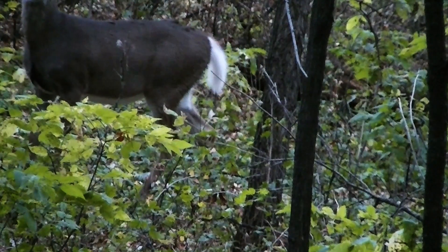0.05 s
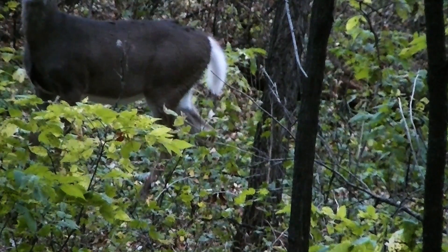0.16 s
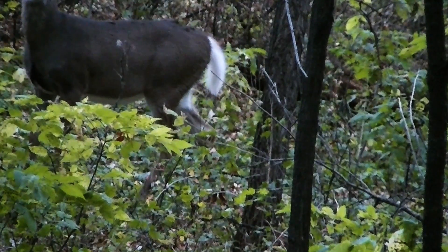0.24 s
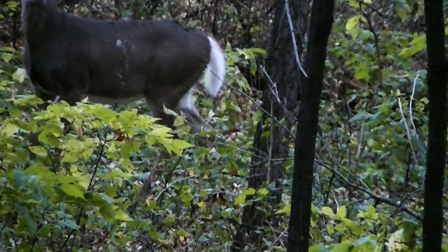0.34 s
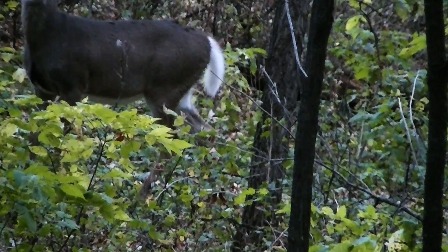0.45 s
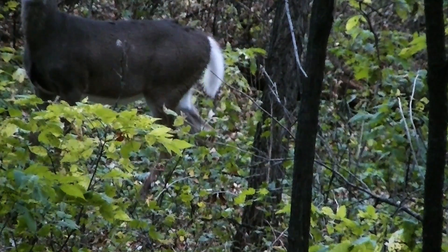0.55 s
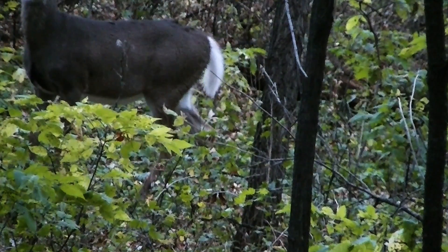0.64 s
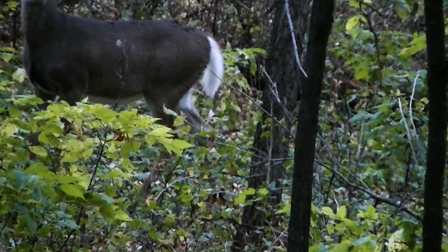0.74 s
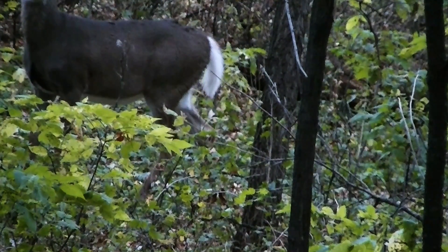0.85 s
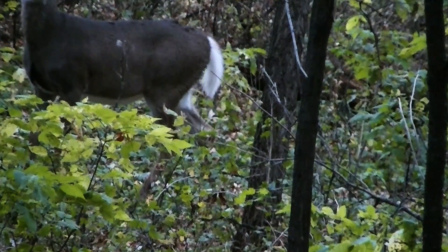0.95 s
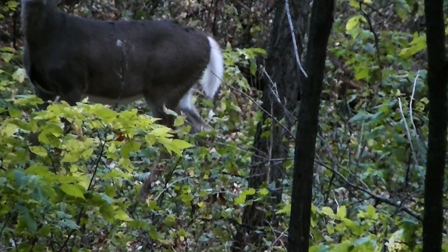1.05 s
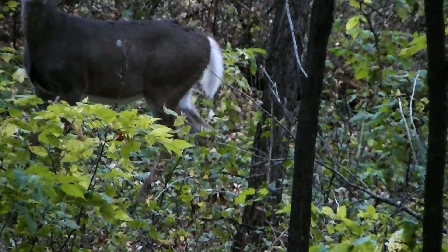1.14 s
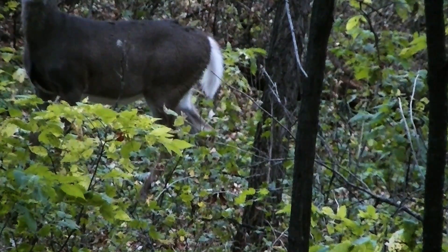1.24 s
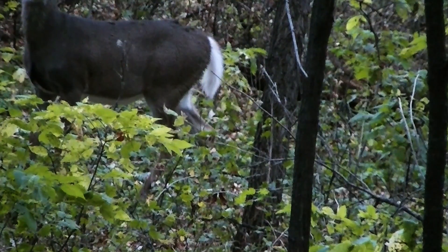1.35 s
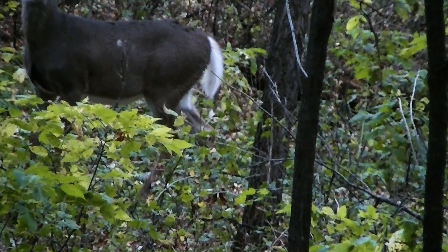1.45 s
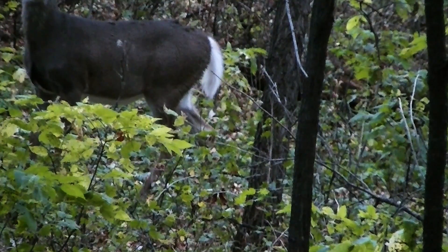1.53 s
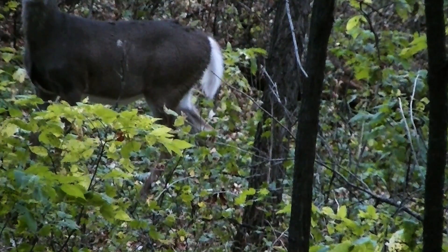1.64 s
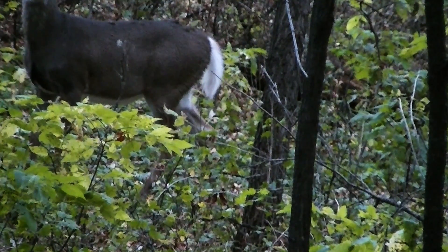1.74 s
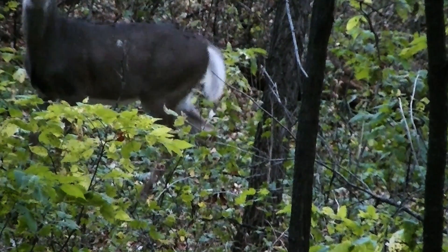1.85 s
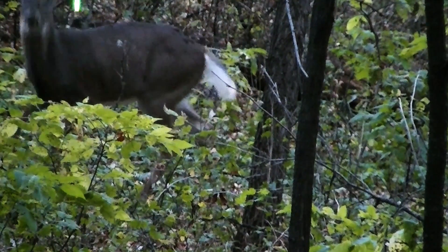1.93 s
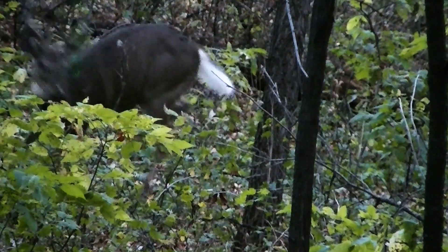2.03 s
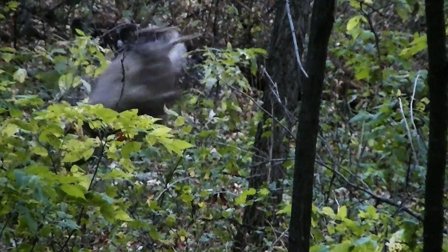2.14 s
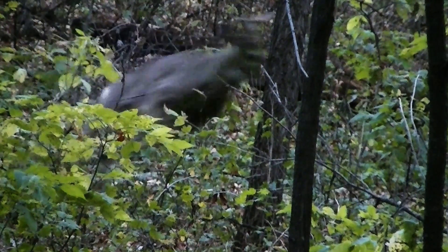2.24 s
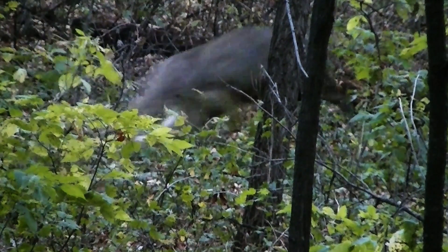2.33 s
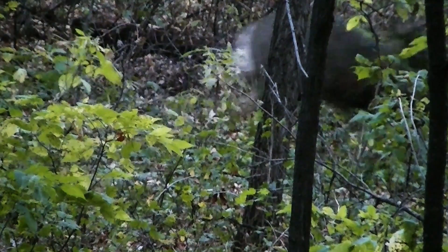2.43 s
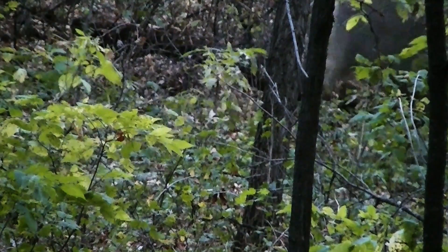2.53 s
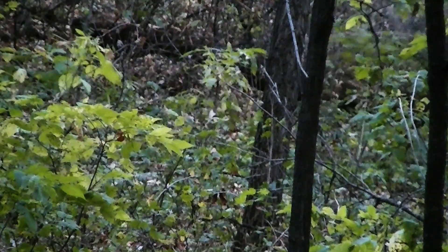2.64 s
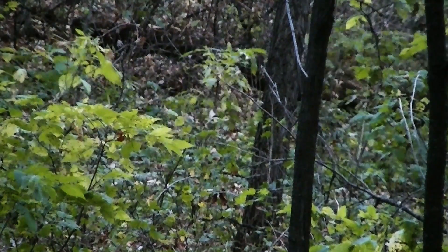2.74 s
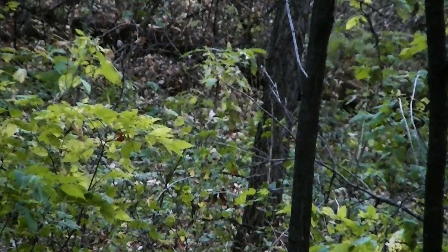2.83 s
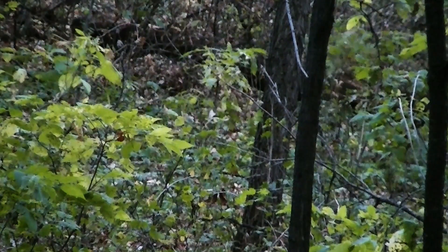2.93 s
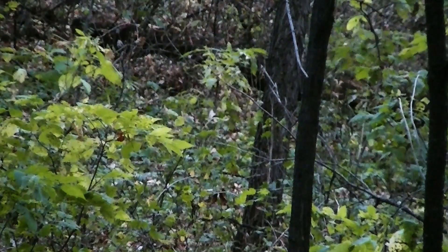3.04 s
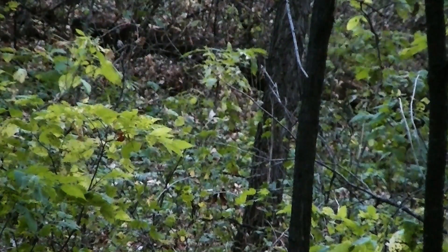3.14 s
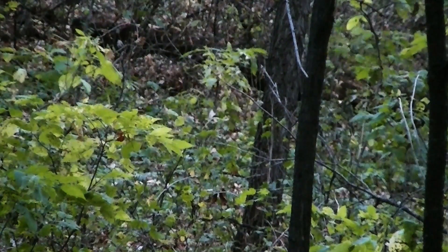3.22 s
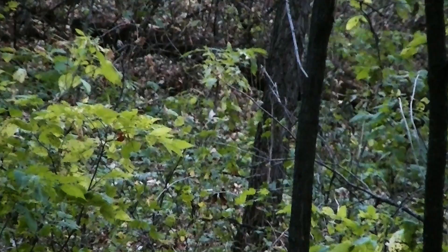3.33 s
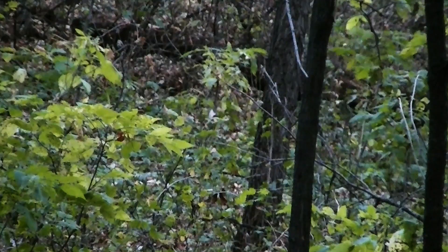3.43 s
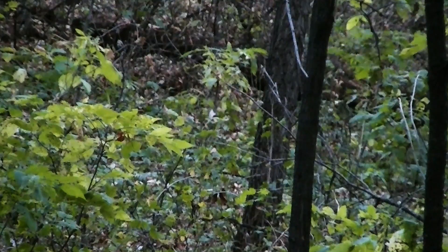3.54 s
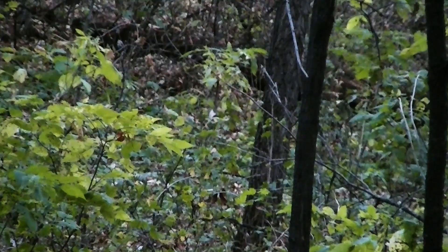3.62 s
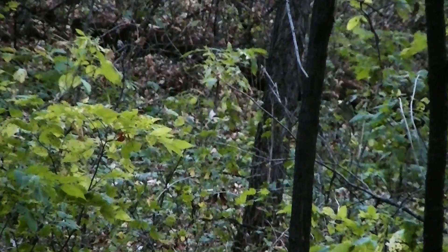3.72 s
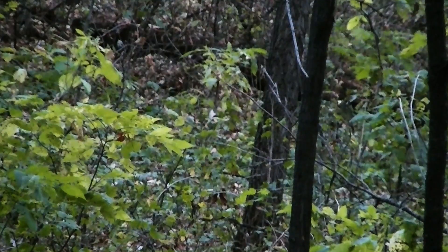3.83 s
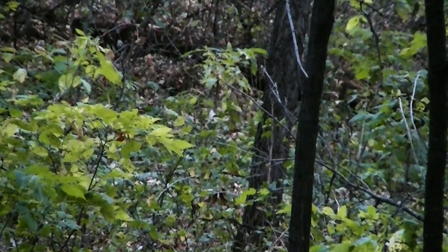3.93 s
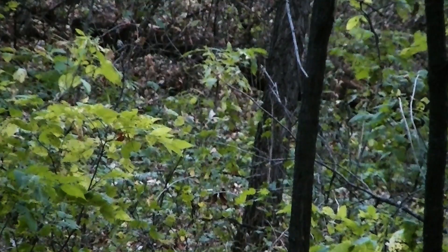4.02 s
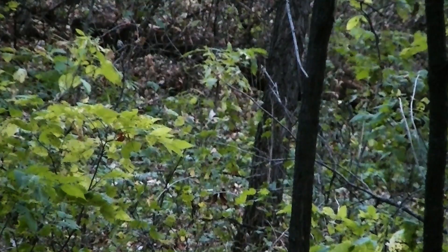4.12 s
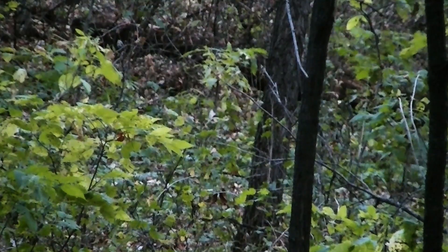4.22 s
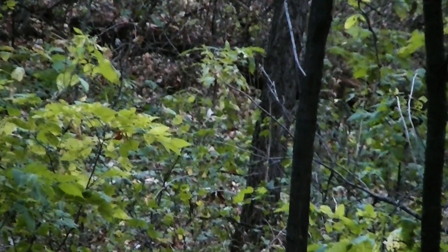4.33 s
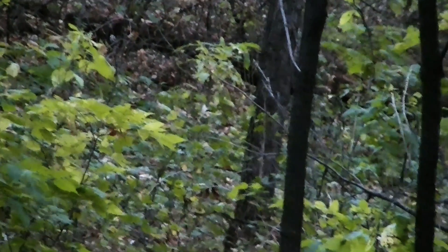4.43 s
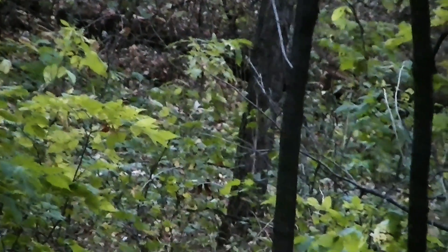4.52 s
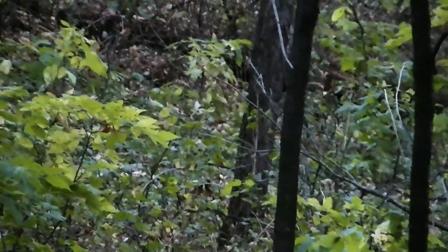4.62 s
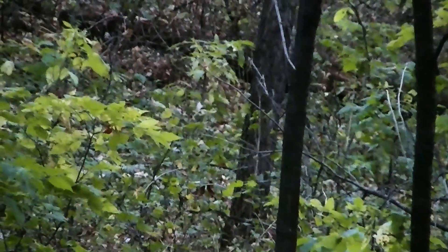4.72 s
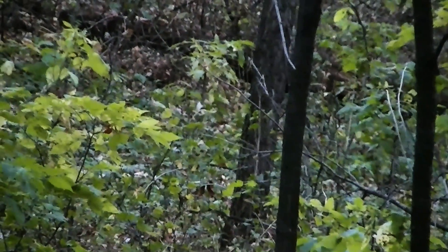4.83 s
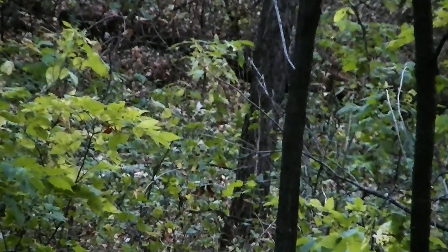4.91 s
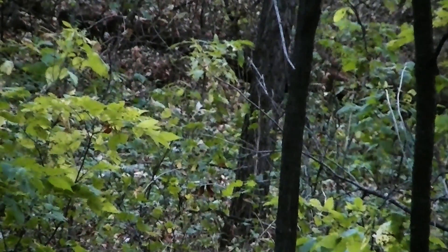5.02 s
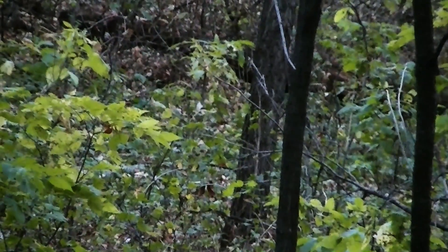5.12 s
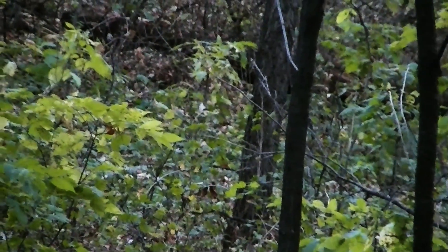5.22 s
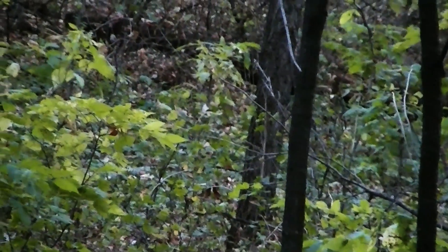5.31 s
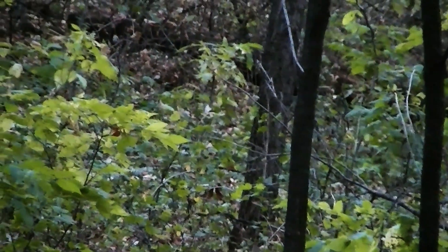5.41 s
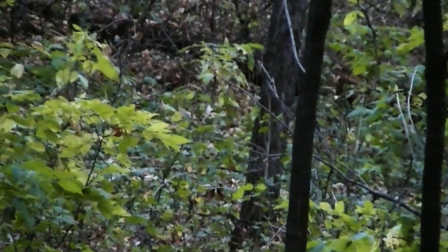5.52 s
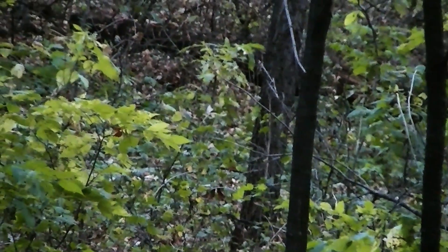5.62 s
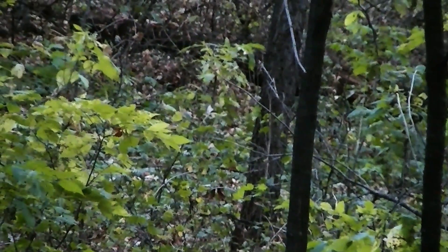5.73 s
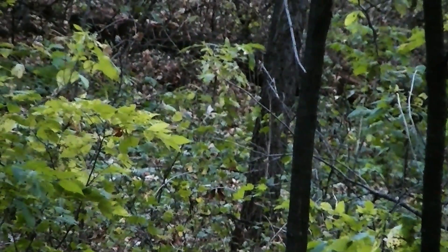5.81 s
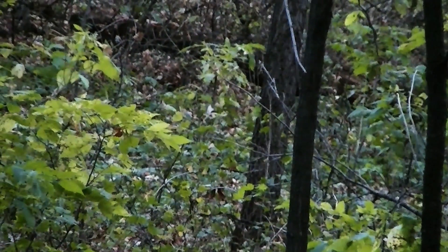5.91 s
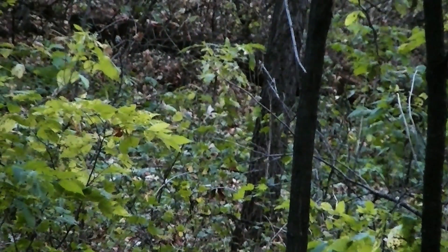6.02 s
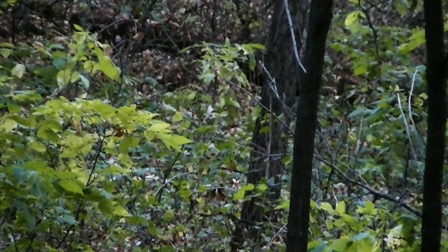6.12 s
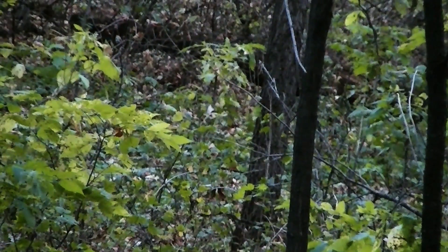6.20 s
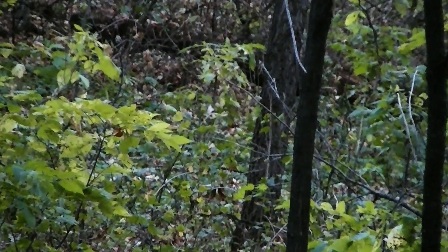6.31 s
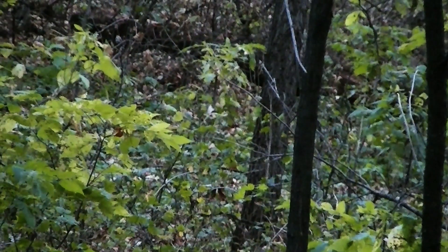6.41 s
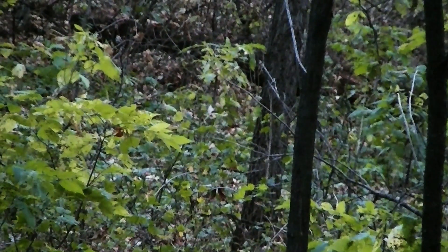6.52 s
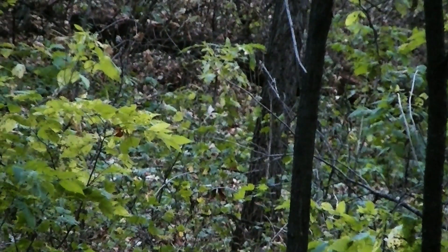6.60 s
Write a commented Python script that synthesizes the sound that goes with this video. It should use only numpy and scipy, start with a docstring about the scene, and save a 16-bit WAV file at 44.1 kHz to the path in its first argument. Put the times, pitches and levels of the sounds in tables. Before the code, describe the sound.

Near silence with recorder hiss and a tiny click, then a bow close to the microphone releases with a loud, distorted, rattling twang. Half a second later an arrow smacks hard into a deer, which bolts through dry leaves and brush, snapping twigs. Two faint low moans fall in pitch, with thin peeps around the first, as the rustling thins out in the woods.

```python
"""First there is only the recorder's own hiss and a small click; then a bow close by is loosed in the woods, and
its string thumps and slaps it again and again, overloading the recorder. Brush starts to rustle, and the arrow
smacks into a deer, which bounds away through leaves and snapping twigs. Later a low moan falls in pitch, two
thin tones peep, and the moan comes once more. Hisses and cracks are shaped noise, rings and calls are sine
tones; the trees answer the bow, blows and twigs with a short wash of noise."""
import sys
import numpy as np
from scipy import signal
from scipy.fft import rfft, irfft, next_fast_len
from scipy.io import wavfile
from scipy.ndimage import uniform_filter1d, map_coordinates

SR = 44100
rng = np.random.default_rng(int(sys.argv[2]) if len(sys.argv) > 2 else 0)


def unload_wav(signal):
    """Save mono or channel-first audio to the path in sys.argv[1] as 16-bit WAV at rate SR, clipped to [-1, 1]."""
    wavfile.write(
        sys.argv[1],
        SR,
        np.round(np.clip(np.atleast_2d(signal).T, -1, 1) * 32767).astype(np.int16),
    )


N = 293660

# Noise colours hold relative levels; t60 is the time in which a sound fades by 60 dB.
# colour of the recorder's own hiss: (frequency [Hz], level per Hz [dB])
HISS_COLOUR = [(12, -54), (20, -17), (59, -26), (162, -6.5), (315, -1.5), (394, -2), (479, 1), (633, -0.5),
               (836, 0.5), (1420, -7.5), (6390, -11.5), (12100, -17), (15600, -22.5)]
# how alike left and right are in the hiss: (frequency [Hz], likeness [0 to 1])
HISS_ALIKE = [(60, 0.7), (180, 0.97), (550, 0.84), (1650, 0.38), (4970, 0.66), (15000, 1)]
# how long the trees answer: (frequency [Hz], t60 [s])
TREE_FADE = [(200, 1), (1000, 1), (4000, 0.7), (7400, 0.63), (15000, 0.77)]
# colour of the trees' answer: (frequency [Hz], level per Hz [dB])
WASH_COLOUR = [(150, -18), (400, 5), (3000, -5), (6300, 9), (7400, -13), (8600, 1.5), (15000, -2.5)]
# path of each moan, one list a call: (time [s], middle pitch [Hz], middle level [dB])
MOANS = [
    [(4.15, 440, -53), (4.24, 410, -47), (4.38, 370, -43), (4.5, 350, -52)],
    [(6.25, 420, -56), (6.33, 395, -50), (6.55, 370, -45.5), (6.66, 360, -59)],
]
# short thin tones: (time [s], length [s], starting pitch [Hz], level before throb and fade [dB])
CHEEPS = [(4.378, 0.022, 1690, -38), (4.72, 0.052, 1844, -24.5)]
# colour of dry leaves: (frequency [Hz], level per Hz [dB])
LEAF_COLOUR = [(880, -36), (1500, -9), (2430, -11), (3340, -1.5), (5350, 1), (7300, -8), (9490, -72),
               (16100, -120)]
# colour of the leaves' extra treble: (frequency [Hz], level per Hz [dB])
TREBLE_COLOUR = [(4350, -19.5), (7400, -7), (8200, 2.5), (10000, -1), (14400, -18), (15600, -22)]
# colour of thrashing stems: (frequency [Hz], level per Hz [dB])
STEM_COLOUR = [(88, -44), (150, -25), (209, -4), (237, -20), (287, -7.5), (1030, -3), (2500, -3.5),
               (3250, -2.5), (5500, -120)]
# how alike left and right are in the brush: (frequency [Hz], likeness [0 to 1])
BRUSH_ALIKE = [(60, 0.49), (180, 0.96), (550, 1), (1650, 1), (4970, 0.97), (15000, 0.97)]
# steady rustle under the strides: (time [s], leaves [dB], treble over leaves [dB], stems over leaves [dB],
# tilt, which lifts the leaves above 4.2 kHz and lowers them below by this much [dB])
RUSTLE = [(1.8, -29, -9, 3, 2), (1.88, -41, -6, -9, -5), (2.03, -39, -8, -8, 1), (2.2, -44, -22, 1, -3.5),
          (2.365, -45, -11, 0, -3.5), (2.43, -35, -6, -9, 0), (2.63, -41, -4, -0.5, 3),
          (2.76, -35, -2, -6.5, -0.6), (3.11, -34.5, -7.5, -11, -1.5), (3.19, -29, -6, -11, -2.5),
          (3.45, -29, -7, -8, -0.5), (3.9, -38.5, -7.5, -4.5, -2), (4.33, -45.5, -19, 1, 0),
          (4.7, -36, -5, -4, 0), (5.04, -42, -6, -3, 1.5), (5.35, -31.5, -9, -5.5, -0.2),
          (5.59, -33.5, -8, -7.5, -0.8), (5.95, -36.5, -7.5, -11.5, -1.3), (6.27, -46.5, -9, 0, -.4),
          (6.66, -51, -10, -1, -1.2)]
# strides and brushes past foliage: (peak time [s], rise [s], leaves at peak [dB], fade [dB per s],
# treble over leaves [dB], stems over leaves [dB])
STRIDES = [(2.062, 0.02, -27.5, 70, -6.5, -26), (2.094, .03, -28, 150, -2, -20),
           (2.107, 0.014, -17.5, 140, -12, -0.5), (2.234, .03, -25.5, 132, -4, -20),
           (2.381, 0.015, -33.5, 107, -3.5, 2.5), (2.795, .035, -30, 47, -5, -10.5),
           (2.865, 0.028, -24.5, 101, -10, -14), (3.019, 0.064, -33.5, 75, -4.5, 1),
           (3.127, 0.0098, -28.5, 69, -6, 0), (3.548, 0.02, -29.5, 79, -3.5, -12),
           (3.658, 0.02, -25, 70, -6, -10), (3.94, 0.015, -35.5, 27, -5.5, -2.5),
           (4.108, 0.054, -24, 152, -7.5, -5), (4.232, 0.085, -29.5, 125, -9, -9),
           (4.378, 0.025, -29, 45, -7, -9), (4.423, 0.017, -30, 188, -1, -6),
           (4.497, 0.011, -29, 300, 0, -0.5), (4.529, 0.023, -20.5, 158, -7, -9),
           (4.63, 0.024, -25, 260, -6.5, -14), (4.728, 0.0062, -24.5, 420, -2.5, -5.5),
           (4.904, 0.057, -35.5, 82, -6, -8.5), (5.08, 0.026, -30.5, 41, -4.5, -12),
           (5.283, 0.037, -25.5, 174, -3.5, -10.5), (5.645, 0.054, -29, 46, -8, -4.5),
           (5.849, 0.024, -35, 100, -10, -23), (5.98, 0.037, -39, 57, -12, -8),
           (6.495, .025, -40, 27, -9.5, -4.5)]
# colour of blows and cracks: (frequency [Hz], level per Hz [dB])
CRACK_COLOUR = [(88, -50), (150, 1.5), (914, -4.5), (1840, -2.5), (2820, 4.5), (3700, 2.5), (4860, 6.5),
                (7300, -8), (9970, -1), (10800, -9.5), (15600, -23)]
# release click, string thump and arrow impact: (time [s], crack [dB], crack t60 [s], treble over bass [dB],
# ring pitch [Hz], ring [dB], ring t60 [s], left over right [dB])
BLOWS = [(0.6694, -29.5, .03, -7, 2200, -34, 0.027, 2), (1.636, -4, 0.022, -9, 2050, -2, 0.022, 1.5),
         (1.636, -12, 0.019, -10, 2390, -0.5, 0.023, 1.5), (1.6615, -4.5, 0.011, -31, 955, 7, 0.004, 1),
         (2.0952, 14, 0.011, -9.5, 363, 6.5, 0.0098, -1), (2.0958, -21, 0.014, -9, 933, -4.5, 0.044, -1),
         (2.097, -20, .02, -9, 700, -10, 0.025, -1)]
# snapping twigs: (time [s], crack [dB], crack t60 [s], treble over bass [dB],
# ring pitch [Hz], ring [dB], left over right [dB])
TWIGS = [(2.054, -29, .03, 1, 4380, -22, 1), (2.118, -15, .018, -3, 4200, -7, 0),
         (2.149, -26, .03, 1, 4770, -12, 3), (2.215, -15, 0.036, 5, 923, -19, 0),
         (2.3735, -6, 0.012, -3, 780, -11.5, 0), (2.514, -31.5, 0.017, 27, 5940, -50, -2),
         (2.689, -32, 0.047, 22, 6200, -37, 0), (3.022, -28, .026, -15, 930, -22, -2),
         (3.1205, -14, 0.01, -17, 3290, -7.5, 0), (3.1503, -6.5, 0.0041, -10, 5020, 3, 3),
         (3.1523, -8.5, 0.013, -12, 715, -15, 2), (3.199, -40, .018, -5, 1470, -16.5, 1),
         (3.548, -23, .02, 7, 5050, -28, -1), (3.661, -9, 0.014, 1, 3270, -16, 0.5),
         (3.938, -25, 0.02, -11, 2020, -17, 1.5), (3.947, -27.5, 0.017, -13, 1530, -18, 0),
         (4.11, -17, 0.021, -7, 270, -19, 1.5), (4.41, -21.5, 0.038, 19, 5500, -18, -3),
         (4.419, -23, .012, 7, 4970, -12, -3), (4.489, -8.5, 0.016, 11, 950, -6, -1.5),
         (4.504, -21, .018, 10, 5200, -15, -3), (4.522, -16, 0.018, 4, 5300, -22, -1),
         (4.555, -15.5, .03, -6, 1910, -14.5, -4), (4.616, -19.5, 0.026, -4, 2500, -27, 0),
         (4.660, -14.5, 0.0086, 10, 7450, -10, 2), (4.718, -17.5, 0.045, 2, 3800, -21, 3),
         (4.979, -27, 0.01, 18, 5470, -40, 3), (5.138, -22, .03, 15, 5040, -34, 0),
         (5.29, -14.5, 0.0099, 23, 4270, -29, 4), (5.609, -30, .012, -12, 900, -22, 2),
         (5.62, -30, 0.03, -12, 1510, -24, 3)]
# string slaps on the bow: (time [s], ring [dB], tick [dB])
SLAPS = [(1.64, -30, -11), (1.6445, -30, -9), (1.6489, -20, 0), (1.6524, 5.5, -6), (1.6558, 2, 8),
         (1.6627, -18, 0), (1.6684, 2.5, 4.5), (1.677, 4.5, 3), (1.6870, 1.5, -11), (1.6956, -2, -3),
         (1.7031, 5, 0.5), (1.7146, -0.5, -21), (1.734, -9.5, -32)]
# tones in the bow's ring: (multiple of the pitch [ratio], level within the ring [dB])
BOW_TONES = [(1, 2.5), (.72, -11), (1.3, -10)]
# colour of a slap's tick: (frequency [Hz], level per Hz [dB])
TICK_COLOUR = [(1500, -12), (5000, -6), (7300, -3), (9000, 2), (11500, -3.5), (15000, -14)]
# rattle of the bow's limbs: (time [s], level [dB])
LIMBS = [(1.634, -27), (1.636, -8), (1.648, -20), (1.655, -2.5), (1.68, -9.5), (1.71, -12), (1.73, -22),
         (1.8, -33)]
# colour of that rattle: (frequency [Hz], level per Hz [dB])
RATTLE_COLOUR = [(88, -61), (150, -4), (445, -7), (879, -10.5), (2370, -6.5), (3770, -8.5), (5150, -11.5),
                 (5560, -24), (6500, -15), (15600, -25.5)]

HISS_DB = -44.5
RISE_DB = 5  # climb for each doubling of the time since a stride began
SPLIT_HZ = 4700  # border of a crack's bass and treble
RING_LASTS = 0.97  # t60 of a twig's ring over that of its crack
# the ring is sharp while the string is tautest and sinks to RING_HZ away from that moment
RING_HZ, SHARP, TAUT_S, SETTLE_S = 3140, 0.074, 1.6526, 0.0017
HOLD_S, HOLD_GROWS = 0.002, 1.2  # a 0 dB slap rings this long before the string damps it; harder ones longer
LOW_CUT_HZ, TOP_HZ = 234, 15735  # little but hiss passes below the first, nothing above the second


def amp(db):
    """Turns dB into gain."""
    return 10 ** (np.asarray(db) / 20)


def unit(x):
    """Scales a sound to an average (rms) level of 1."""
    return x / np.sqrt(np.mean(x ** 2) + 1e-20)


def along(points, hz):
    """Reads between (Hz, value) points, on a log frequency axis."""
    f, v = np.transpose(points)
    return np.interp(np.log(hz + 1), np.log(f + 1), v)


def curves(rows):
    """Gives one value per sample for each column after the time."""
    s, *cols = np.transpose(rows)
    return [np.interp(np.arange(N) / SR, s, c) for c in cols]


def wobble(rate):
    """Makes a smooth random curve with this many random points a second."""
    points = rng.standard_normal(int(N * rate / SR) + 4)
    return map_coordinates(points, [np.arange(N) * rate / SR])


def filtered(x, response):
    """Multiplies each frequency of a sound by its response."""
    m = next_fast_len(N + SR // 2)
    return irfft(rfft(x, m) * response(np.fft.rfftfreq(m, 1 / SR)), m)[..., :N]


def rush(spectrum, alike, grains=1):
    """Makes stereo noise of rms 1, chopped by a gain per sample and then coloured."""
    def colour(hz):
        turn = np.arccos(np.clip(along(alike, hz), -1, 1)) / 2  # shares power between middle and sides
        return amp(along(spectrum, hz)) * [np.cos(turn), np.sin(turn)]

    pair = grains * rng.standard_normal((2, N))
    mid, side = filtered(pair, colour)
    return unit(np.array([mid + side, mid - side]))


def add(track, s, sound):
    """Mixes a sound in at a time."""
    start = round(s * SR)
    track[..., start:start + sound.shape[-1]] += sound


def hiss():
    """The recorder's own hiss is a steady coloured noise."""
    return amp(HISS_DB) * rush(HISS_COLOUR, HISS_ALIKE)


def trees(x):
    """Countless trunks scatter the sound: its power, blurred in pitch, dies away band by band as noise."""
    hz, t, z = signal.stft(x.mean(axis=0), SR, nperseg=256)
    power = uniform_filter1d(np.abs(z) ** 2, size=9, axis=0)
    decay = amp(-60 * t[:400] / along(TREE_FADE, hz)[:, None]) ** 2
    decay = decay / decay.sum(axis=1, keepdims=True)
    power = np.abs(signal.fftconvolve(power, decay, axes=1)[:, :len(t)])
    noise = signal.stft(rush(WASH_COLOUR, [(1000, 1.0)]), SR, nperseg=256)[2]
    noise = noise / np.sqrt(np.mean(np.abs(noise) ** 2))
    wash = signal.istft(noise * np.sqrt(power), SR, nperseg=256)[1]
    return np.pad(wash, ((0, 0), (300, 0)))[:, :N]  # the answer comes 300 samples late


def moan():
    """Each moan is a faint falling tone, blurred by uneven strength and pitch."""
    out, seconds = np.zeros(N), np.arange(N) / SR
    for call in MOANS:
        hz, db = curves(call)
        sounding = (seconds > call[0][0]) & (seconds < call[-1][0])
        cycles = np.cumsum(hz * (1 + 0.073 * wobble(70))) / SR
        out += sounding * amp(db + 4.3 * wobble(40)) * np.sin(2 * np.pi * cycles)
    return out


def cheeps():
    """Each thin tone throbs, fades, sags a little in pitch and stops short."""
    out = np.zeros(N)
    for s, length, hz, db in CHEEPS:
        t = np.arange(round(length * SR)) / SR
        edges = np.clip(np.minimum(t, length - t) / 0.0025, 0, 1)
        throb_db = 3 * np.cos(2 * np.pi * 40 * (t - 0.005))
        fade_db = -90 * t
        tone = np.sin(2 * np.pi * hz * (t - 0.23 * t * t))
        add(out, s, edges * amp(db + throb_db + fade_db) * tone)
    return out


def crunch(rate, life, spread_db):
    """Many small breakages as a gain: each starts at once and dies away quickly, over a steady bed."""
    sizes = amp(spread_db * np.minimum(rng.exponential(size=N), 4))
    starts = (rng.random(N) < rate / SR) * sizes  # rate is breakages a second
    return 1 + signal.lfilter([1], [1, -np.exp(-1 / (life * SR))], starts)


def crackle(count, centre_hz, spread, cycles, spread_db):
    """Single pieces crack as short damped tones at scattered times, pitches and sizes; rms 1."""
    when, pitch = rng.random(count), rng.standard_normal(count)
    size = np.minimum(rng.exponential(size=count), 3)
    hz = np.clip(centre_hz * np.exp(spread * pitch), 300, 14000)[:, None]
    k = np.arange(256)
    fade = np.exp(-k * hz / SR / cycles)
    tones = amp(spread_db * size)[:, None] * fade * np.sin(2 * np.pi * hz * k / SR)
    places = (when * N).astype(int)[:, None] + k
    return unit(np.bincount(places.ravel(), tones.ravel(), N + 256)[:N])


def strides():
    """Each stride climbs to its peak and fades; its power adds to the rustle of leaves, treble and stems."""
    seconds = np.arange(N) / SR
    leaves_db, treble_db, stems_db, _ = curves(RUSTLE)
    power = amp([leaves_db, leaves_db + treble_db, leaves_db + stems_db]) ** 2
    for s, rise, db, fade_db, treble_db, stems_db in STRIDES:
        opened = np.clip(1 + (seconds - s) / rise, 1e-6, 1)
        shape_db = RISE_DB * np.log2(opened) - fade_db * np.maximum(seconds - s, 0)
        power = power + amp(db + np.array([[0], [treble_db], [stems_db]]) + shape_db) ** 2
    fade_in = np.clip((seconds - RUSTLE[0][0]) / 0.071, 0, 1)
    return np.sqrt(power) * fade_in


def brush():
    """Dry leaves hiss and crack in fine grains, stems thrash in coarser ones; each stride swells all of them."""
    leaves_gain, treble_gain, stems_gain = strides()
    grains = amp(1.13 * wobble(40)) * crunch(rate=150, life=0.00056, spread_db=-6.0)
    leaves = rush(LEAF_COLOUR, BRUSH_ALIKE, grains)
    leaves += amp(-11) * crackle(count=1500, centre_hz=4200, spread=0.372, cycles=2.2, spread_db=3.5)
    leaves = leaves_gain * leaves + treble_gain * rush(TREBLE_COLOUR, BRUSH_ALIKE, grains)

    low = filtered(leaves, lambda hz: 1 / (1 + (hz / 4200) ** 6))
    tilt = amp(curves(RUSTLE)[-1])
    leaves = low / tilt + (leaves - low) * tilt

    coarse = amp(0.85 * wobble(30)) * crunch(rate=30, life=0.0033, spread_db=-1.3)
    stems = rush(STEM_COLOUR, BRUSH_ALIKE, coarse)
    stems += amp(-10) * crackle(count=700, centre_hz=1255, spread=0.31, cycles=2.2, spread_db=1.5)
    return leaves + stems_gain * stems


def blows_and_twigs():
    """Each blow or breaking twig is a burst of noise, dull or bright, with a brief ring at its own pitch."""
    out, t = np.zeros((2, N + SR)), np.arange(SR // 6) / SR
    rise = 1 - np.exp(-t / 0.0003)
    noise = rush(CRACK_COLOUR, [(1000, 0.99)])
    bass = filtered(noise, lambda hz: 1 / (1 + (hz / SPLIT_HZ) ** 4))
    treble = noise - bass
    twigs = [(s, db, t60, tilt_db, hz, ring_db, RING_LASTS * t60, pan_db)
             for s, db, t60, tilt_db, hz, ring_db, pan_db in TWIGS]
    for s, db, t60, tilt_db, hz, ring_db, ring_t60, pan_db in BLOWS + twigs:
        part = slice(round(s * SR), round(s * SR) + len(t))
        crack = amp(-tilt_db / 2) * bass[:, part] + amp(tilt_db / 2) * treble[:, part]
        crack = amp(db - 60 * t / t60) * crack
        ring = amp(ring_db - 60 * t / ring_t60) * np.sin(2 * np.pi * hz * t)
        pan = amp([[pan_db / 2], [-pan_db / 2]])
        add(out, s, pan * rise * (ring + crack))
    return out[:, :N]


def bow():
    """Each slap ticks, then rings the bow until the string damps it; the limbs rattle underneath."""
    out, t = np.zeros((2, N + SR)), np.arange(SR // 20) / SR
    ticks = rush(TICK_COLOUR, [(1000, 0.99)])
    for s, ring_db, tick_db in SLAPS:
        hz = RING_HZ * (1 + SHARP * np.exp(-abs(s - TAUT_S) / SETTLE_S))
        ring = sum(amp(db) * np.sin(2 * np.pi * k * hz * t) for k, db in BOW_TONES)
        hold = HOLD_S * amp(HOLD_GROWS * ring_db)
        fade_db = -60 * t / 0.041 - 60 * np.clip(t - hold, 0, None) / 0.0051  # slow, then damped
        rise = 1 - np.exp(-t / 0.00019)
        add(out, s + 0.0006, amp(ring_db + fade_db) * ring * rise)
        tick = ticks[:, round(s * SR):][:, :len(t)]
        add(out, s, amp(tick_db - 60 * t / 0.013) * tick)
    seconds = np.arange(N) / SR
    shaking = (seconds > LIMBS[0][0]) & (seconds < LIMBS[-1][0])
    rattle = shaking * amp(curves(LIMBS)[0]) * rush(RATTLE_COLOUR, [(1000, 0.99)])
    return out[:, :N] + rattle


def scene():
    """Mixes the bow, blows, twigs and brush with the trees' wash, the calls and the recorder's hiss."""
    slaps, blows = bow(), blows_and_twigs()
    wash = trees(amp(-21.5) * slaps + amp(-13) * blows)
    loud = slaps + blows + wash + brush()
    # deep bass is cut away steeply
    loud = filtered(loud, lambda hz: (1j * hz / (LOW_CUT_HZ + 1j * hz)) ** 3)
    return loud + moan() + cheeps() + hiss()


def record(dry):
    """The recorder clips close to full scale, then keeps nothing above its band limit."""
    clipped = dry / (1 + np.abs(dry / 0.98) ** 16) ** (1 / 16)
    return filtered(clipped, lambda hz: hz < TOP_HZ)


dry = scene()
out = record(dry)
unload_wav(out)
```